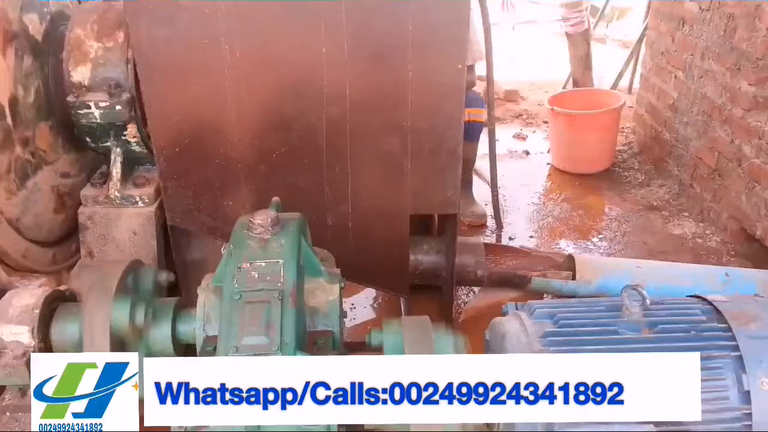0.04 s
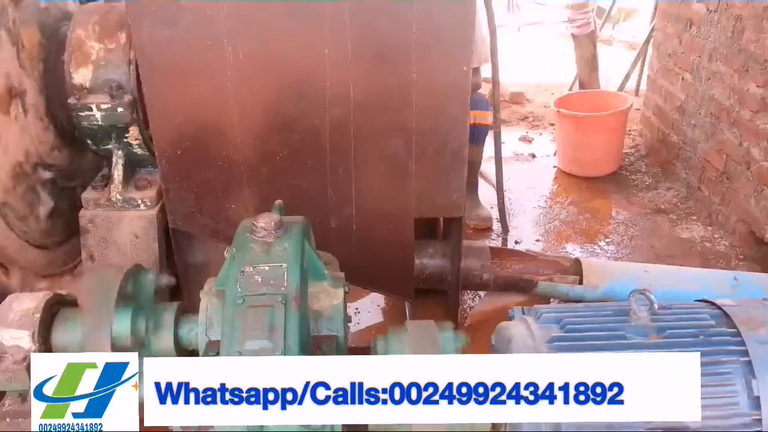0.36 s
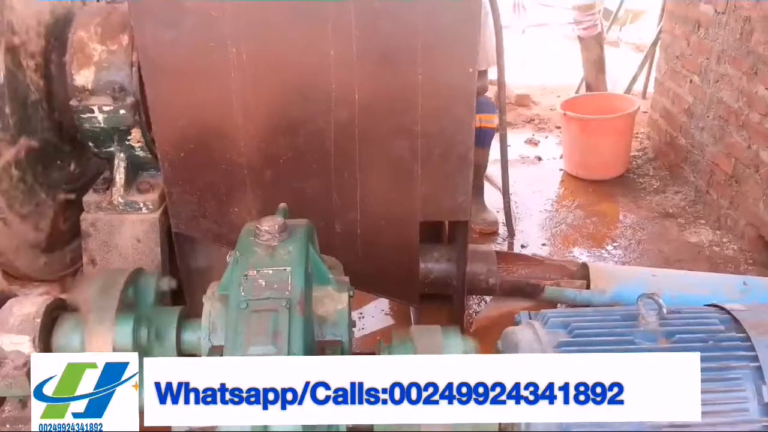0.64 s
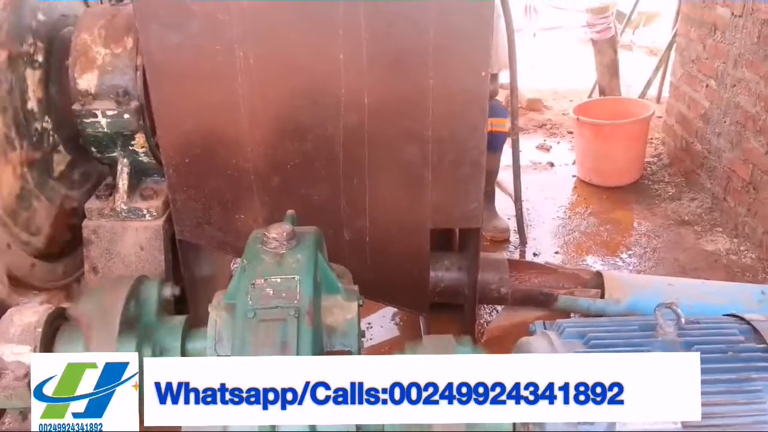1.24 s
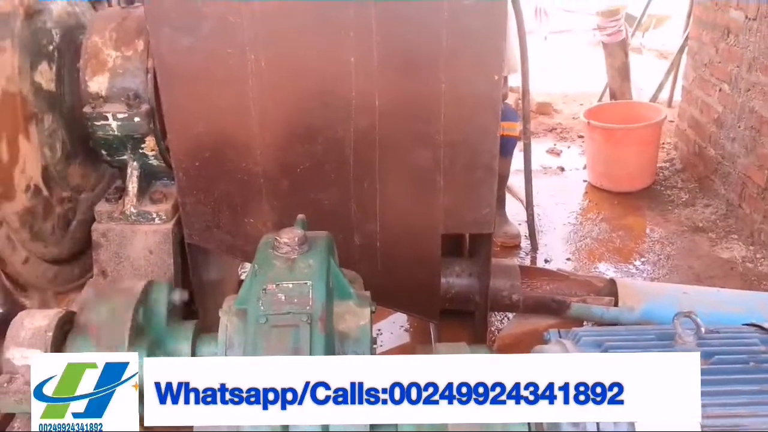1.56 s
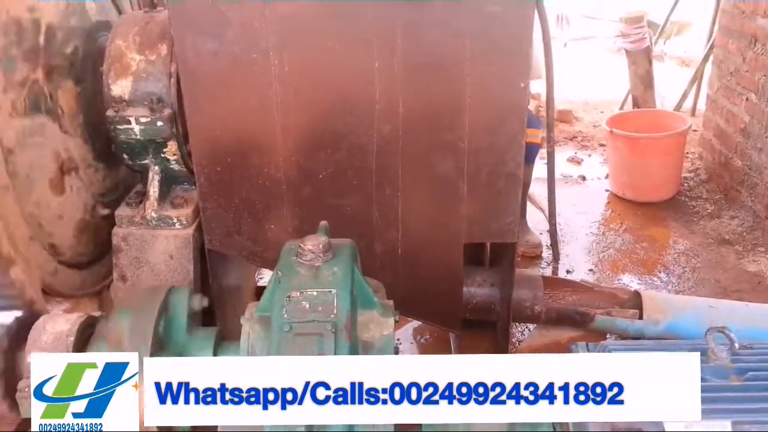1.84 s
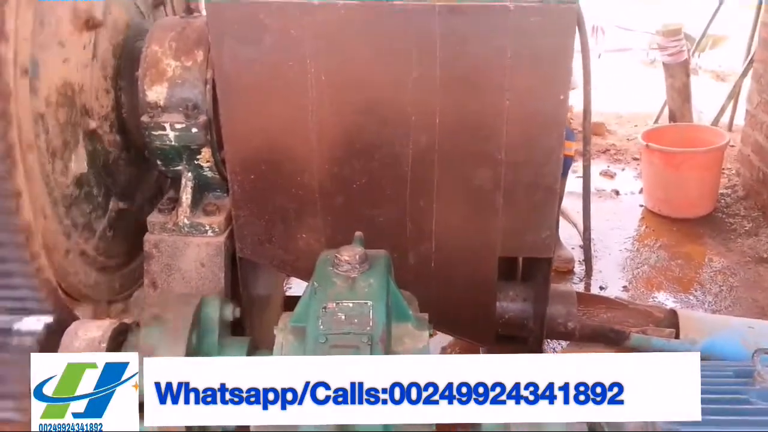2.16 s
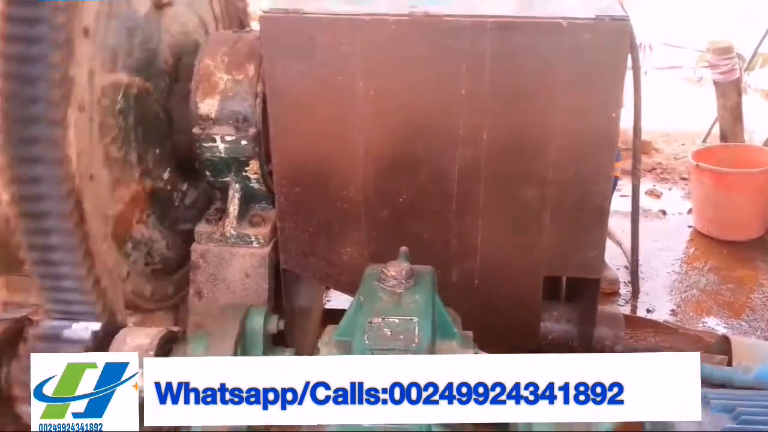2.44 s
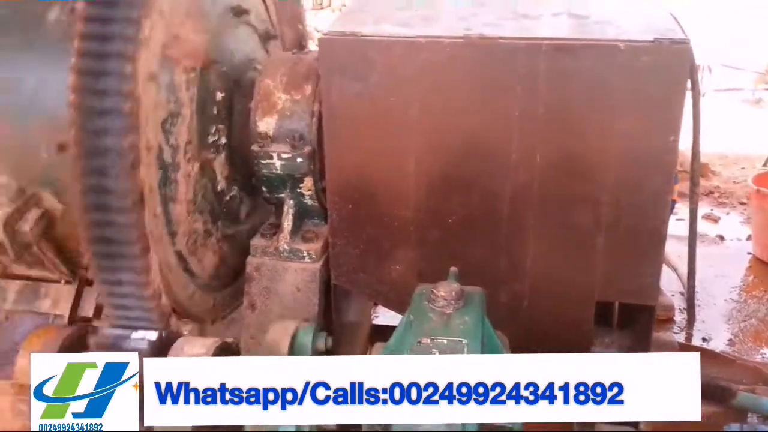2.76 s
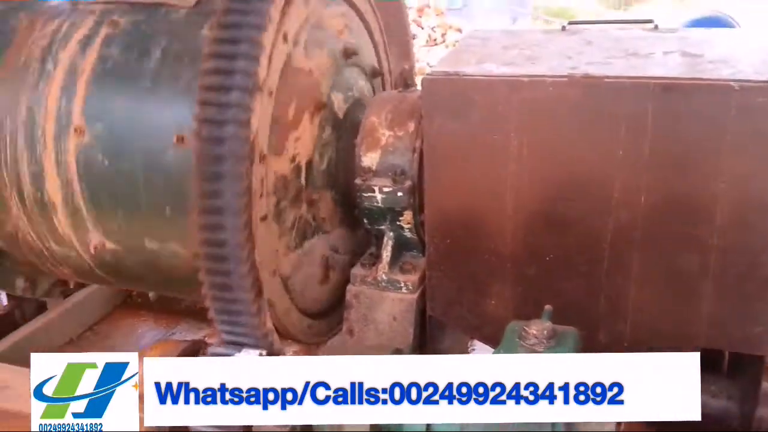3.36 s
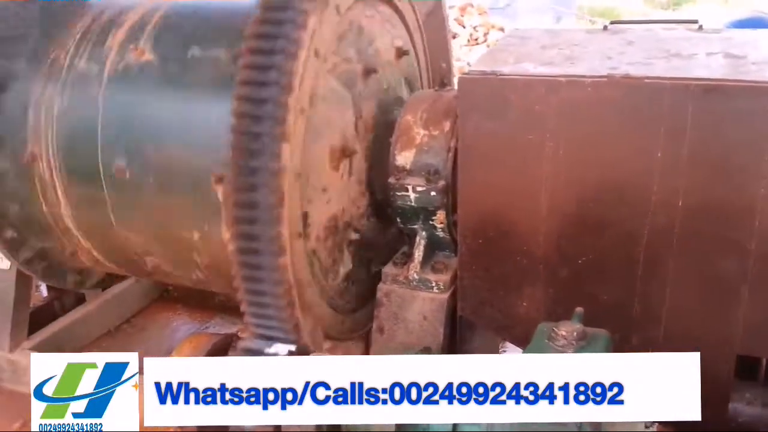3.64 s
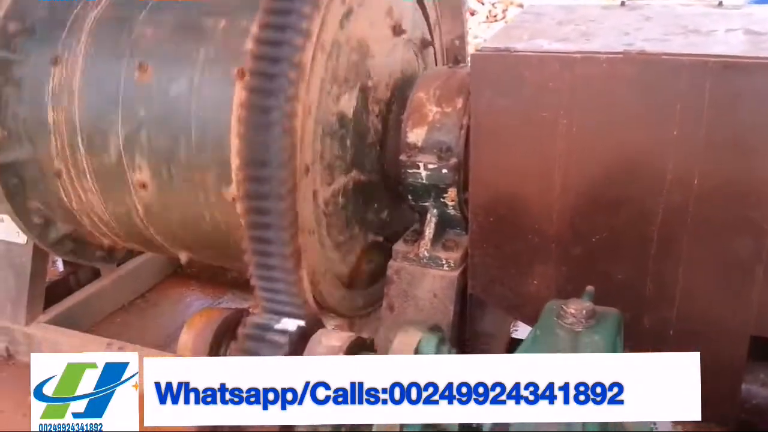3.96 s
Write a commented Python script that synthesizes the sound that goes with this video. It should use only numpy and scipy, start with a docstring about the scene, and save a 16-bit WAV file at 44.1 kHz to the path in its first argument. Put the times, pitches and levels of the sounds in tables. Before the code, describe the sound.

A grinding mill cuts in abruptly and runs steadily outdoors, heard close up. Steel balls and ore tumble in a dense clatter, with occasional heavy knocks and metallic ringing, while gears drone and whine underneath.

```python
"""A dense clatter of steel balls and ore cuts in abruptly: a grinding mill, outdoors by a brick wall.
The charge falls without pause inside the drum as thuds, clangs, clacks, clinks and grit, swelling
when it slumps. Heavy balls knock singly and showers of balls ring bare steel.
Under the clatter the pinion drones on the ring gear, the gearbox whines and the frame hums."""
import sys
import numpy as np
from scipy import signal
from scipy.fft import rfft, irfft
from scipy.io import wavfile
from scipy.ndimage import uniform_filter1d

SR = 44100
rng = np.random.default_rng(int(sys.argv[2]) if len(sys.argv) > 2 else 0)


def log_audio(samples):
    """Write samples as a 16-bit WAV file to the path given in sys.argv[1]."""
    # one column per channel
    frames = np.atleast_2d(samples).T
    # limit to full scale, then quantise
    limited = np.clip(frames, -1, 1)
    pcm = np.round(limited * 32767).astype(np.int16)
    wavfile.write(sys.argv[1], SR, pcm)


N = 176400
TIME_S = np.arange(N) / SR
FREQ_HZ = np.arange(N // 2 + 1) * SR / N
SIDES = np.array([[1], [-1]])  # left, right


def charge(gain_db=-14, flutter_db=0.6):
    """Balls and ore hit the drum in five sizes of impact, swelling as the charge slumps."""
    # thud, clang, clack, clink, grit: low_hz, high_hz, hits_per_s, t60_s, spread_db, swell_db, level_db
    impact_sizes = [(25, 543, 800, 0.11, 3, -0.9, -0.6), (528, 1260, 900, 0.055, 3.5, 0, 1.46),
                    (1170, 2770, 850, 0.048, 3.5, 0.52, -0.5), (2930, 5450, 900, 0.061, 4, 0.5, 0.5),
                    (6010, 10080, 1000, 0.08, 9, 0.75, 2.5)]
    # slumps and lulls: centre_s, half_length_s, thud_db, clang_db, clack_db, clink_db, grit_db
    slumps = [(0.26, 0.018, -1.5, 1, 3.5, -1, 0.5), (0.315, 0.0092, 2, 2, 2, -1, 3.5),
              (0.374, 0.026, 0, 5, 1.0, 2.5, 0.5), (0.545, 0.015, 2.5, 3.5, 1.5, 2, -0.5),
              (0.593, 0.015, 3, 6.5, 2.0, 3, -2), (0.628, 0.007, -2, 2.0, 4, 1.5, 2),
              (0.75, 0.031, -1, 4.5, 0, 3.5, 1.5), (0.8, 0.05, 5, -2, 1.5, 2.5, 3),
              (0.9, 0.028, -1, -0.5, 1.0, 3.5, 2.0), (0.954, 0.041, 6, 2.5, 0.0, 2.5, 0),
              (1.137, 0.011, 4.5, -6, 0.5, 4, 3), (1.237, 0.019, 1.5, 2, 4.5, 3, -1.5),
              (1.36, 0.017, -2.0, 0.5, 4.5, -0.5, -1), (1.461, 0.013, 1.0, 4, 1.5, -1, -2),
              (1.557, 0.087, 2, 1, 1, 0.5, 2.0), (1.683, 0.014, -1, 2.5, 3, -0.5, -1),
              (1.765, 0.016, 3, 0.5, 0.5, 0, 0), (1.877, 0.042, 3, 4.5, 3, 1, 0.0),
              (1.955, 0.045, 0.5, -1.0, 1.5, 1.5, 0.5), (2.087, 0.023, 3, 1.5, -0.5, 4.5, 1),
              (2.19, 0.055, -1.5, 0, 2.5, 2, 0), (2.268, 0.035, 0.5, 4, 0.5, -0.5, -2),
              (2.39, 0.064, -1, 1.0, 1, -1.5, -1), (2.485, 0.012, 3, -1, 1.5, 5, 3.0),
              (2.627, 0.016, -3, 2, 0.5, 2.5, 2), (2.697, 0.018, -4, 2, 1.0, 4.5, 3.5),
              (2.802, 0.025, -1.0, -0.5, 0, 0.0, 0), (2.945, 0.02, 5, 3, 0.0, 3, 1),
              (3.12, 0.025, -2, 2, 1.5, 1.5, 3), (3.206, 0.034, 1, -1.5, 0.0, 1.5, -1.0),
              (3.312, 0.032, -1, 0, 0, 2.5, 3.5), (3.39, 0.029, 0, 0, -0.0, 1.0, -0.5),
              (3.546, 0.015, 4.5, 5, 3.5, -1, 1.5), (3.627, 0.035, -0.5, -3.5, 0, 1, -0.5),
              (3.74, 0.011, 0, -2, 2, 1.5, 0), (3.81, 0.034, -0.5, 2, -1.5, -1.5, 1.0),
              (3.92, 0.017, -3, -2, 3.5, 4, 1)]
    # clink and grit level: time_s, gain_db
    fine_level = [(.22, -.5), (.7, -2.1), (1.2, 0.2), (2.0, -1.26), (2.85, -0.1), (3.1, -1.5), (4, -1.4)]
    # listener turning towards the drum: time_s, share
    facing = [(.22, 0), (2.7, 0), (3.3, 0.5), (4, 1)]
    # lift when facing it: thud_db, clang_db, clack_db, clink_db, grit_db
    facing_db = [.8, 1.0, 1, 0.092, 0.23]
    clumps_db = flutter_db * walk(80)  # balls landing together
    spectrum = 0
    for k, (low_hz, high_hz, hits_per_s, t60_s, spread_db, swell_db, level_db) in enumerate(impact_sizes):
        slump_db = sum(lift_db[k] * bump(TIME_S - at_s, half_s) for at_s, half_s, *lift_db in slumps)
        level_db += slump_db + clumps_db + swell_db * walk(12) + facing_db[k] * curve(facing)
        if k > 2:
            level_db += curve(fine_level)
        hits = bandpass(impacts(hits_per_s, t60_s, spread_db), low_hz, high_hz)
        spectrum += rfft(even_loudness(hits) * np.std(hits) * undb(level_db))
    return undb(gain_db) * irfft(stereo_image(spectrum * shell_gain()), N)


def impacts(hits_per_s, t60_s, spread_db, spots=12):
    """Hits of random size and timing, spread over several spots of the shell."""
    spectrum = 0
    for _ in range(spots):
        struck = np.flatnonzero(rng.random(N) < hits_per_s / spots / SR)
        size, polarity = rng.standard_normal((2, len(struck)))
        hits = np.zeros(N)
        hits[struck] = undb(spread_db * np.minimum(size, 2)) * np.sign(polarity)
        spectrum += rfft(hits) * rfft(shell_strike(t60_s), N)
    return unit(irfft(spectrum, N))


def shell_strike(t60_s, crack_s=0.00043, crack_db=-10, wall_s=0.013, yard_t60_s=0.22, yard_db=-2.5):
    """One stereo strike: a contact crack, dense modes dying away, then the yard's reverberation."""
    t = np.arange(SR // 4) / SR
    crack = undb(crack_db) * np.exp(-t / crack_s)
    body = unit(undb(-60 * t / t60_s) * (1 + crack))
    yard = unit(undb(-60 * t / yard_t60_s) * (t > wall_s))
    return np.hypot(body, undb(yard_db) * yard) * rng.standard_normal((2, len(t)))


def even_loudness(hits, span_s=0.05, evenness=0.9):
    """Evens out the loudness of the random hits into a steady clatter."""
    power = smooth(np.mean(hits ** 2, axis=0), int(span_s * SR))
    return unit(hits / (power + 1e-9) ** (evenness / 2))


def shell_gain():
    """Frequency response of the steel shell: a broad colour plus three ringing modes."""
    # shell colour: freq_hz, gain_db
    colour = [(25, -32), (50, -24.5), (110, -17), (170, -7), (225, -1), (270, 2), (310, -5), (370, -4),
              (420, 0), (540, -7.5), (615, -6), (690, -2), (770, -3.5), (940, -4.5), (1150, -4),
              (1750, 0.5), (2350, -2), (2750, -7), (3250, -10.5), (4100, -9.5), (5200, -7.5), (6200, -11),
              (7300, -8.5), (8000, -15.5), (8800, -21.5), (10000, -26), (11500, -52)]
    # shell modes: pitch_hz, width_hz, lift_db
    modes = [(540, 26, 7.5), (1053, 13, 4), (1330, 70, 2.5)]
    modes_db = sum(db / (1 + (2 * (FREQ_HZ - hz) / width_hz) ** 2) for hz, width_hz, db in modes)
    return unit(undb(by_hz(colour) + modes_db))


def stereo_image(spectra):
    """Mix two independent spectra to left and right: low mids alike, treble diffuse."""
    # channel balance: freq_hz, left_minus_right_db
    balance = [(60, -8), (200, 3), (600, 1.5), (1100, 3), (1900, 1), (2400, 0.5), (2750, -3.5), (3300, 1),
               (4100, 6), (5200, 7.5), (6200, 0), (7300, -13.5), (8800, -14), (11000, -27)]
    # channel likeness: freq_hz, correlation
    likeness = [(50, 0.12), (170, 0.87), (280, 0.98), (500, 0.77), (700, 0.72), (1000, 0.19),
                (1350, -0.046), (1750, -0.18), (2350, 0.21), (3050, -0.26), (3900, 0.045), (5000, -0.053)]
    mid, side = spectra
    alike = by_hz(likeness)
    pair = mid * np.sqrt((1 + alike) / 2) + SIDES * side * np.sqrt((1 - alike) / 2)
    pan = undb(SIDES * by_hz(balance) / 2)
    return pair * pan / np.sqrt(np.mean(pan ** 2, axis=0))


def knocks(gain_db=7.5):
    """Single heavy balls land on the shell and stand out of the clatter."""
    # landings: start_s, level_db
    landings = [(0.431, -12), (1.337, -13), (1.392, -10), (1.616, -13), (1.675, -4), (2.578, -3),
                (2.888, -12), (3.658, -2), (3.741, -5)]
    out = np.zeros((2, N + SR))
    for start_s, level_db in landings:
        blow = shell_strike(t60_s=0.06)
        start = int(start_s * SR)
        out[:, start:start + blow.shape[1]] += undb(level_db + gain_db) * blow / np.abs(blow).max()
    return bandpass(out[:, :N], low_hz=550, high_hz=2480)


def bare_steel(hits_per_s=160, spread_db=2.5, t60_s=0.075, scatter=0.008, shower_oct=0.4, top_hz=6130):
    """Balls ring bare steel, slightly off pitch; each shower lifts the modes near its own pitch."""
    # steel modes: pitch_hz, level_db
    modes = [(2190, -36), (2336, -34.5), (2450, -41), (2562, -38.5), (2680, -41), (2830, -38.5),
             (2990, -43), (3229, -42), (3550, -38), (3779, -38.5), (3985, -32.5), (4380, -35), (4835, -42),
             (5275, -44)]
    # showers of balls: centre_s, half_length_s, pitch_hz, lift_db
    showers = [(.92, 0.12, 5000, 7), (1.257, 0.24, 2880, 6.5), (2.35, .08, 3700, 8),
               (2.693, 0.11, 2800, 6.5), (2.88, 0.17, 2720, 7.5)]
    # ringing fades as the listener turns away: time_s, gain_db
    ring_level = [(.22, 2), (2.0, -2.5), (2.95, -1), (3.06, -1), (3.3, -18), (4, -9)]
    struck = np.flatnonzero(rng.random(N) < hits_per_s / SR)
    sizes = undb(spread_db * np.clip(rng.standard_normal(len(struck)), -2, 2))
    decay = undb(-60 / (t60_s * SR))
    out = 0
    for mode_hz, level_db in modes:
        hits = np.zeros((2, N), complex)
        hits[:, struck] = sizes * np.exp(2j * np.pi * rng.random((2, len(struck))))
        envelope = signal.lfilter([1], [1, -decay], hits)
        phase = 2 * np.pi * np.cumsum(mode_hz * (1 + scatter * walk(39.98))) / SR
        ringing = unit(np.imag(envelope * np.exp(1j * phase)))
        shower_db = sum(lift_db * bump(TIME_S - at_s, half_s) * bump(np.log2(mode_hz / hz), shower_oct)
                        for at_s, half_s, hz, lift_db in showers)
        out += ringing * undb(level_db + shower_db)
    lowpass = signal.butter(4, top_hz, fs=SR, output="sos")
    return signal.sosfilt(lowpass, out) * undb(curve(ring_level))


def ring_gear(tooth_hz=33.57):
    """The pinion drones on the ring gear at multiples of the tooth rate."""
    # drone partials: multiple, level_db
    partials = [(4, -46.5), (6, -28.5), (8, -42.5), (10, -37.5), (20, -33.5)]
    return tones(tooth_hz, partials, waver_db=1.1, waver_hz=19, jitter_rad=0.11)


def gearbox(balance_db=-1):
    """Meshing gears whine, drifting with shaft speed, slightly to the right."""
    # mesh rate: time_s, pitch_hz
    mesh = [(.22, 466.5), (.8, 469), (1.2, 466.0), (2.0, 466), (2.5, 467.5), (3.0, 465), (4, 464.5)]
    # whine partials: multiple, level_db
    partials = [(1, -29), (2, -38)]
    # whine swells: time_s, gain_db
    swells = [(.22, -3.5), (.5, 1.5), (.7, 3.5), (.81, 8), (.89, -3.5), (1.02, 10), (1.3, 2), (1.39, -5),
              (1.5, 2.5), (1.72, 0), (1.88, 2.5), (2.19, 2), (2.28, 5.5), (2.55, 3.5), (2.68, -1), (2.8, 3),
              (3.0, -2), (3.15, 0), (3.23, 5), (3.45, -.5), (3.85, 4), (4, 2)]
    whine = tones(curve(mesh), partials, waver_db=2, waver_hz=26.1, jitter_rad=0.34, drift_rad=0.14)
    return whine * undb(curve(swells) + SIDES * balance_db / 2)


def frame_hum():
    """The frame hums faintly and unsteadily on two low tones."""
    # frame tones: pitch_hz, level_db
    hums = [(70.3, -52), (105.4, -51)]
    return sum(tones(hz, [(1, db)], waver_db=8, waver_hz=7.3, jitter_rad=0.3) for hz, db in hums)


def tones(base_hz, partials, waver_db, waver_hz, jitter_rad, drift_rad=0):
    """Multiples of a base rate, each wavering in level and phase with the load."""
    phase = 2 * np.pi * np.cumsum(base_hz * np.ones(N)) / SR + drift_rad * walk(4)
    out = 0
    for multiple, level_db in partials:
        amplitude = np.sqrt(2) * undb(level_db + waver_db * walk(waver_hz))
        offset_rad = jitter_rad * walk(waver_hz) + 2 * np.pi * rng.random()
        out += amplitude * np.sin(multiple * phase + offset_rad)
    return out


def undb(db):
    return 10 ** (np.asarray(db) / 20)


def unit(x):
    return x / np.sqrt(np.mean(x ** 2))


def bump(offset, half_width):
    return np.exp(-(offset / half_width) ** 2)


def smooth(x, samples):
    return uniform_filter1d(uniform_filter1d(x, samples), samples)


def curve(points):
    """Interpolate (time_s, value) points."""
    return np.interp(TIME_S, *np.array(points).T)


def by_hz(points):
    """Interpolate (freq_hz, value) points on a log axis."""
    hz, values = np.array(points).T
    return np.interp(np.log(np.maximum(FREQ_HZ, 1)), np.log(hz), values)


def walk(rate_hz):
    """Smooth random wander, unit RMS."""
    hold = int(SR / rate_hz)
    steps = np.repeat(rng.standard_normal(N // hold + 1), hold)
    return unit(smooth(steps, hold)[:N])


def bandpass(x, low_hz, high_hz):
    """Band filter: the power between two low-pass slopes."""
    power = 1 / (1 + (FREQ_HZ / high_hz) ** 10) - 1 / (1 + (FREQ_HZ / low_hz) ** 10)
    return irfft(rfft(x) * np.sqrt(np.abs(power)), N)


def scene():
    return charge() + knocks() + bare_steel() + ring_gear() + gearbox() + frame_hum()


def record(dry, start_s=0.2212, rise_s=0.0055, ceiling=0.92, top_hz=11400):
    """Abrupt switch-on, rounded peaks, steep treble cut."""
    gate = np.clip((TIME_S - start_s) / rise_s, 0, 1)
    rounded = dry / (1 + (dry / ceiling) ** 8) ** (1 / 8)
    lowpass = signal.ellip(8, 0.2, 80, top_hz, fs=SR, output="sos")
    return signal.sosfilt(lowpass, rounded * gate)


dry = scene()
out = record(dry)
log_audio(out)
```